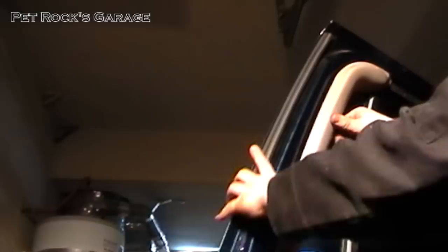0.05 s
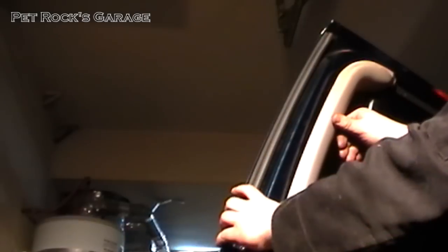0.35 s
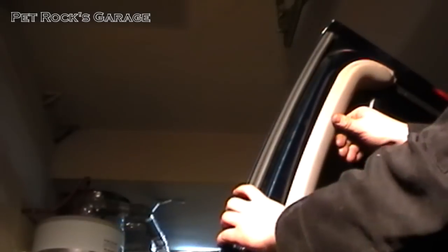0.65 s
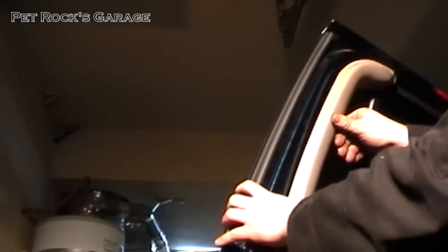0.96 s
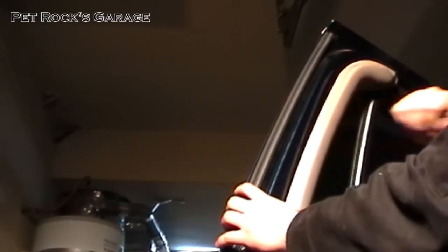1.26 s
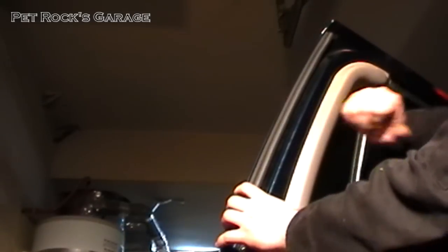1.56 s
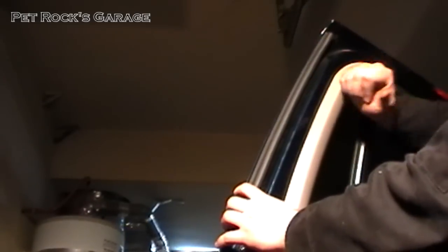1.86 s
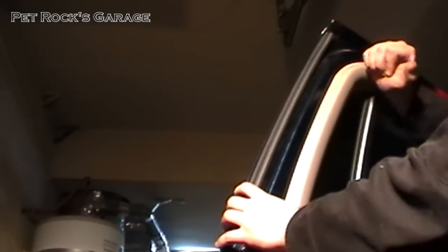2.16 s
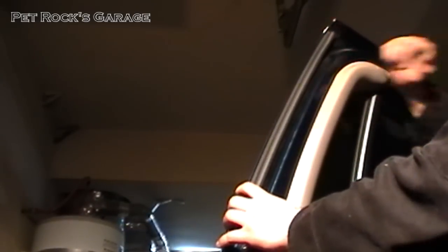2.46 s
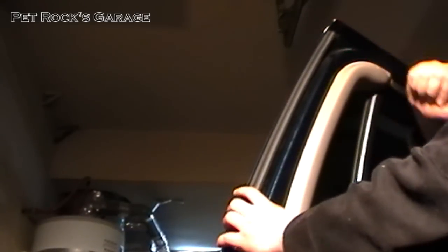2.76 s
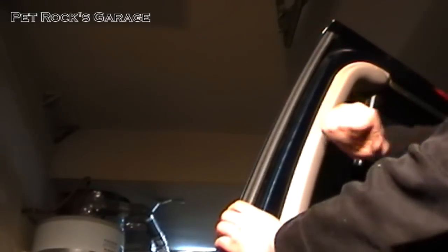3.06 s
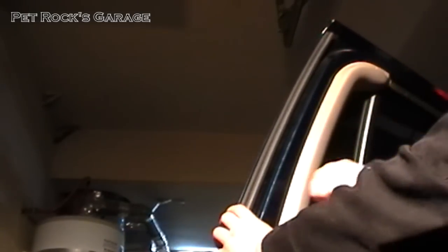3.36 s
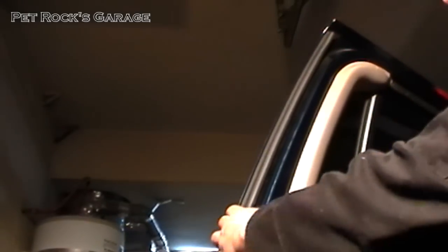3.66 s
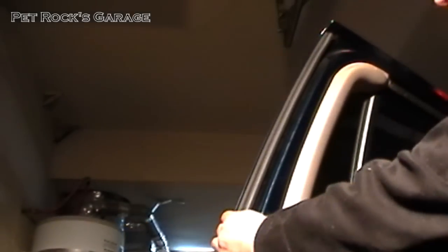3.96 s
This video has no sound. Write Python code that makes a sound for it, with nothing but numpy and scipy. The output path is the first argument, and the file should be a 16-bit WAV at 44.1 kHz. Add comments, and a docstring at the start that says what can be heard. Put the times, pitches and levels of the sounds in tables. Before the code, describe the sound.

A fist knocks plastic trim onto a car door frame. Light ticks and a clip snap lead to a loud, ringing crack, then hollow knocks with low booms. A sleeve rustles close by in a small garage with faint ventilation.

```python
"""A small garage, ventilation running: a fist knocks the plastic trim home on an open car door's frame.
Each knock or clip snap is a light first touch, then the hollow panel, the clack and crack of its clips,
and the boom of the door. The hardest clip sets the steel frame ringing. In between, a sleeve rustles
and the trim ticks under the fingers. A limiter ducks the loud hits, so the room swells up behind them."""
import sys
import numpy as np
from scipy import signal
from scipy.fft import rfft, irfft
from scipy.io import wavfile

SR = 44100
rng = np.random.default_rng(int(sys.argv[2]) if len(sys.argv) > 2 else 0)


def waveform_to_disk(signal):
    """Save audio, clipped to [-1, 1], as 16-bit WAV at the path in sys.argv[1]."""
    frames = np.transpose(np.atleast_2d(signal))
    scaled = np.clip(frames, -1, 1) * 32767
    samples = np.round(scaled).astype(np.int16)
    wavfile.write(sys.argv[1], SR, samples)


N = 176400
T = np.arange(N) / SR
SNAP_RISE_S = 0.00026   # attack of every hard contact


def from_db(db):
    """Decibels to gain."""
    return 10 ** (np.asarray(db) / 20)


def at_hz(table, hz, column=1):
    """Read a table on a log-frequency axis."""
    rows = np.array(table)
    return np.interp(np.log(hz + 1e-3), np.log(rows[:, 0]), rows[:, column])


def add(out, start_s, x):
    """Mix x in from start_s."""
    i = max(int(start_s * SR), 0)
    out[i:i + len(x)] += x[:max(N - i, 0)]


def lag(x, seconds):
    """One-pole smoothing."""
    pole = np.exp(-1 / (seconds * SR))
    return signal.lfilter([1 - pole], [1, -pole], x)


def noise(colour):
    """Steady noise of a given colour, rms 1."""
    hz = np.fft.rfftfreq(N, 1 / SR)
    phases = np.exp(2j * np.pi * rng.random(len(hz)))
    x = irfft(phases * from_db(at_hz(colour, hz)) * (hz > 20), N)
    return x / x.std()


def burst(colour, t60_s, rise_s, hold_s):
    """Countless close modes struck together: they rise, hold while the contact lasts, and die away."""
    t = T[:SR]
    envelope = (1 - np.exp(-(t / rise_s) ** 2)) * from_db(-60 * np.maximum(t - hold_s, 0) / t60_s)
    uneven = rfft(rng.standard_normal(SR) * envelope)
    even = uneven / (np.abs(uneven) + 1e-12)   # no mode stands out
    x = irfft(even * from_db(at_hz(colour, np.fft.rfftfreq(SR, 1 / SR))), SR) * np.sqrt(envelope)
    return x * np.sqrt(np.sum(envelope ** 2) / np.sum(x ** 2))


def ring(modes, rise_s):
    """Single decaying modes, struck a little differently every time."""
    t = T[:2 * SR]
    x = 0
    for pitch_hz, level_db, t60_s in modes:
        decay = from_db(level_db + rng.normal(0, 1) - 60 * t / t60_s)
        x = x + decay * np.sin(2 * np.pi * (pitch_hz * t + rng.random()))
    return x * (1 - np.exp(-(t / rise_s) ** 2))


# Colour of the ventilation bed: freq_hz, relative_db
VENT_COLOUR = [(25, -42.5), (50, -25), (110, -13), (170, -4), (256, 0), (373, -1.5), (490, -13.5),
               (840, -12), (2550, -27), (3620, -29), (7300, -38), (12200, -36.5), (16000, -44)]


def ventilation():
    """Moving air: a low, steady rush."""
    return from_db(-49.5) * noise(VENT_COLOUR)


def electrical_whine(pitch_hz=13022):
    """One thin, faint, steady tone."""
    return from_db(-70) * np.sin(2 * np.pi * pitch_hz * T)


# The garage's reverb tail: freq_hz, level_db, t60_s
GARAGE_TAIL = [(44, -18.5, 1.6), (99, -21, 0.52), (204, -8.5, 0.5), (494, -7, 0.45), (1296, -4, 0.5),
               (3600, -8.5, 0.5), (6700, -9, 0.45), (11200, -15, 0.37), (16000, -18, 0.28)]


def garage_reverb(send, build_s=0.0027, diffuse_share=0.45):
    """The room dies away band by band, as dense echoes and a wash of stored energy; mid and side."""
    edges = np.concatenate([np.geomspace(30, 2000, 14)[:-1], np.geomspace(2000, 17000, 18)])
    white = rfft(rng.standard_normal((2, N)))
    hz = np.fft.rfftfreq(N, 1 / SR)
    wash, impulse = 0, 0
    for low, high in zip(edges, edges[1:]):
        centre_hz = np.sqrt(low * high)
        gain, t60_s = from_db(at_hz(GARAGE_TAIL, centre_hz)), at_hz(GARAGE_TAIL, centre_hz, column=2)
        band = irfft(white * ((hz >= low) & (hz < high)), N)
        band_pass = signal.butter(2, [low, high], "band", fs=SR, output="sos")
        power = signal.sosfilt(band_pass, send + 1e-12) ** 2
        # the wash follows the source's energy but loses its fine colour
        stored = lag(lag(power, build_s), t60_s / np.log(1e6))
        wash = wash + gain * np.sqrt(stored) * band / band.std()
        decay = from_db(-60 * T[:SR] / t60_s) * (1 - np.exp(-T[:SR] / build_s))
        impulse = impulse + gain * band[:, :SR] * decay / np.linalg.norm(decay)
    echoes = signal.fftconvolve(send[None], impulse, axes=1)[:, :N]
    return np.sqrt(diffuse_share) * wash + np.sqrt(1 - diffuse_share) * echoes


# Stereo width across the spectrum: freq_hz, side_gain_db
STEREO_WIDTH = [(40, 5.5), (130, -7.5), (500, -9.5), (1100, -7), (2200, -8.5), (5000, -40), (9000, -35.5),
                (13000, -0.5)]


def stereo_spread(side):
    """What differs between left and right: widest in the deep bass and at the very top."""
    width = from_db(at_hz(STEREO_WIDTH, np.fft.rfftfreq(2 * N, 1 / SR)))
    return irfft(rfft(side, 2 * N) * width)[:N] * np.array([[1], [-1]])


# Swishes of the sleeve: centre_s, half_length_s, level_db
SLEEVE_SWISHES = [(0.004, 0.07, -54.5), (0.212, 0.08, -47.5), (1.027, 0.03, -51), (1.18, 0.018, -51.5),
                  (1.314, 0.034, -68), (1.545, 0.13, -57.5), (2.887, .06, -54.5), (3.37, 0.046, -55),
                  (3.636, 0.065, -51)]
# Colour of rubbing cloth: freq_hz, relative_db
CLOTH_COLOUR = [(300, -12), (1200, -1), (3200, 1.5), (5800, -6.5), (7300, -8), (9500, -4), (13000, -5),
                (16000, -1.5)]


def sleeve_rustle(grain_db=0.5):
    """Cloth slides on cloth in soft, grainy swells."""
    power = sum(from_db(level_db) ** 2 * np.exp(-((T - centre_s) / half_length_s) ** 2)
                for centre_s, half_length_s, level_db in SLEEVE_SWISHES)
    grain = noise([(30, 15), (200, -7), (1500, -40), (8000, -72)])
    return np.sqrt(power) * from_db(grain_db * grain) * noise(CLOTH_COLOUR)


# Colour of a clip's clack: freq_hz, relative_db
CLACK_COLOUR = [(500, -3.5), (1300, -1.5), (2100, 2), (2500, -3), (3000, 5), (3800, 4), (4800, -4),
                (5700, -12.5), (8000, -26)]


def clip_clack(hold_s):
    """A clip seats with a short, dry clack."""
    return burst(CLACK_COLOUR, t60_s=0.021, rise_s=SNAP_RISE_S, hold_s=hold_s)


# Colour of cracking plastic edges: freq_hz, relative_db
CRACK_COLOUR = [(2000, -14.5), (5000, -2), (5750, -15.5), (6500, -3), (7250, -11.5), (8200, -3),
                (11500, 0.5), (14000, -2), (16000, -3.5)]


def edge_crack(hold_s):
    """Plastic edges meet with a sharp, bright crack."""
    return burst(CRACK_COLOUR, t60_s=0.04, rise_s=SNAP_RISE_S, hold_s=hold_s)


# Cues for the small ticks: start_s, clack_db, crack_db, metal_db
TICK_CUES = [(0.312, -36, -38.5, -26.5), (0.889, -55, -70, -75), (1.1215, -38.5, -52.5, -66)]
# Ping of a metal clip: pitch_hz, level_db, t60_s
METAL_CLIP_MODES = [(3849, -9, 0.047), (8300, -8.5, 0.057), (10300, -11.5, 0.091)]


def finger_ticks():
    """Trim and clips click lightly under the fingers."""
    out = np.zeros(N)
    for start_s, clack_db, crack_db, metal_db in TICK_CUES:
        add(out, start_s, from_db(clack_db) * clip_clack(0) + from_db(crack_db) * edge_crack(0))
        add(out, start_s, from_db(metal_db) * ring(METAL_CLIP_MODES, SNAP_RISE_S))
    return out


# Tones of the flexing trim: pitch_hz, level_db, t60_s
TRIM_FLEX_MODES = [(250, -7, .22), (1290, 0, .12), (1400, -5, .1), (1880, -4, .08), (2030, -6, .08)]


def trim_flex(start_s=0.4405):
    """The thumb's press makes the trim flex as its first clip snaps."""
    out = np.zeros(N)
    add(out, start_s, from_db(-22) * ring(TRIM_FLEX_MODES, SNAP_RISE_S))
    return out


# Bright ring of the steel frame: pitch_hz, level_db, t60_s
STEEL_FRAME_MODES = [(2637, -12, .35), (3620, 4, .6), (3700, -4.5, 0.51), (3871, 7, .6), (4040, 2, .6),
                     (4231, -7, .55)]


def frame_ring(start_s=1.59):
    out = np.zeros(N)
    add(out, start_s, from_db(-28.5) * ring(STEEL_FRAME_MODES, SNAP_RISE_S))
    return out


# Low notes of the whole door: pitch_hz, level_db, t60_s
BOOM_MODES = [(44.4, -15.5, 2), (70.4, -12.5, 1.1), (94.3, -1, 0.4), (119.6, -10.5, 0.75), (135.9, 3, 0.31),
              (154.3, -3, 0.62), (236, -1.5, .6), (345.7, -16.5, 1.1)]
# Colour of the dense modes between them: freq_hz, relative_db
BOOM_COLOUR = [(28, -37.5), (45, -4.5), (60, -14), (120, 0), (250, 3), (450, -5.5), (800, -17), (2000, -38)]


def door_boom(rise_s=0.02):
    """The whole door takes up the hit and blooms into a low boom."""
    boom = ring(BOOM_MODES, rise_s)
    boom[:SR] += burst(BOOM_COLOUR, t60_s=0.48, rise_s=rise_s, hold_s=rise_s)
    return boom


# Colour of the panel's dense modes: freq_hz, relative_db
PANEL_COLOUR = [(60, -33), (150, -6.5), (350, -1.5), (650, -1.5), (1050, -6.5), (1500, -11), (2400, -14.5),
                (5000, -35.5)]
# Its strongest notes: pitch_hz, level_db, t60_s
PANEL_NOTES = [(244.6, -12.5, 0.07), (352, -11, 0.069), (434, -12.5, 0.11), (561, -5.5, 0.062),
               (650, -7, .06), (981.5, -4, 0.056), (1148, -13.5, 0.081), (1383, -13.5, 0.069),
               (1844, -15, 0.086)]


def hollow_panel(hold_s, rise_s=0.0018):
    """The hollow plastic panel gives the knock its short, boxy body."""
    body = burst(PANEL_COLOUR, t60_s=0.072, rise_s=rise_s, hold_s=hold_s)
    return body + ring(PANEL_NOTES, rise_s)[:SR]


# Brief ring of the clips as they seat: pitch_hz, level_db, t60_s
SEATING_MODES = [(2720, -21, 0.12), (3550, -26, 0.037), (3720, -5, 0.034), (3855, -3.5, 0.011),
                 (4110, -19, 0.021)]


def trim_hit(hold_s, panel_db, clack_db, crack_db, crack_cutoff_hz):
    """One contact on the trim sounds the panel, its clips and its edges together."""
    panel = hollow_panel(hold_s)
    clack = clip_clack(hold_s) + ring(SEATING_MODES, SNAP_RISE_S)[:SR]
    low_pass = signal.butter(2, crack_cutoff_hz, fs=SR, output="sos")
    crack = signal.sosfilt(low_pass, edge_crack(hold_s) + 1e-18)
    return from_db(panel_db) * panel + from_db(clack_db) * clack + from_db(crack_db) * crack


# Cues for knocks and clip snaps on the trim: hit_s, touch_lead_s, touch_gain_db, hold_s, panel_db,
# clack_db, crack_db, crack_cutoff_hz, boom_db, send_db
HIT_CUES = [ (0.4401, 0.0021, -2.5, 0.0011, -26, -18, -4.5, 17600, -58, 1.5),
            (1.5829, 0.0059, 5.5, 0.0067, -4.5, 2.5, 4.5, 15000, -42, -0.5),
            (1.59, .001, -12, 0.0031, 1, 4.5, 4, 13000, -48, -1),
            (1.919, 0.0036, 4.5, 0.00033, -15.5, -12, -32, 11100, -22.5, 2.5),
            (2.2216, 0.0049, 9, 0.001, -8, -4, 3.5, 10900, -20.5, -0.5),
            (2.61, 0.0061, -1, 0.00052, -20.5, -21, -17, 10800, -26, 6),
            (2.6445, 0.0014, -15, 0.00033, -46, -14.5, -23.5, 14900, -41, -2.5),
            (3.1522, 0.0042, 5.5, 0.0022, -8.5, -15, -18.5, 10500, -28, -1.5),
            (3.4015, 0.0064, 1.5, 0.0066, -10, -14.5, -15, 10400, -33, 1.5),
            (3.7081, 0.0038, -2, 0.0062, -10.5, -13, -17.5, 10000, -29, 2),
            (3.986, 0.0032, -17, 0.0015, -21, -45, -40, 10000, -10.5, 8)]


def trim_knocks_and_snaps():
    """A light touch, then a knock or a clip snapping in; returns direct sound and reverb send."""
    direct, send = np.zeros(N), np.zeros(N)
    for (hit_s, touch_lead_s, touch_gain_db, hold_s, panel_db, clack_db, crack_db,
         crack_cutoff_hz, boom_db, send_db) in HIT_CUES:
        hit = np.zeros(N)
        touch = trim_hit(0, panel_db=-37, clack_db=-29, crack_db=-28.5, crack_cutoff_hz=crack_cutoff_hz)
        add(hit, hit_s - touch_lead_s, from_db(touch_gain_db) * touch)
        add(hit, hit_s, trim_hit(hold_s, panel_db, clack_db, crack_db, crack_cutoff_hz))
        add(hit, hit_s, from_db(boom_db) * door_boom())
        direct += hit
        send += from_db(send_db) * hit
    return direct, send


def scene():
    """Knocks, snaps and handling in the garage, over ventilation and whine, mixed as mid and side."""
    hits, hit_send = trim_knocks_and_snaps()
    flex, frame = trim_flex(), frame_ring()
    handling = flex + finger_ticks() + sleeve_rustle()
    direct = hits + frame + handling
    room_mid, room_side = garage_reverb(hit_send + handling)
    near_echo = from_db(-3) * np.interp(T - 0.0069, T, direct)   # a 6.9 ms slap widens the direct sound
    mid = direct + room_mid + ventilation()
    side = near_echo + room_side + ventilation()
    return mid + stereo_spread(side) + electrical_whine()


def record(dry):
    """A fast limiter that recovers slowly, then soft clipping and a cut of the very top."""
    ceiling_db, release_db_per_s, attack_s, look_ahead_s = -3.5, 153.5, 0.00018, 0.00035
    over_db = np.maximum(20 * np.log10(np.abs(dry).max(axis=0) + 1e-9) - ceiling_db, 0)
    held_db = np.maximum.accumulate(over_db + release_db_per_s * T) - release_db_per_s * T
    duck_db = np.interp(T + look_ahead_s, T, lag(held_db, attack_s))
    limited = dry * from_db(-duck_db)
    low_pass = signal.ellip(10, .1, 80, 15850, fs=SR, output="sos")
    return signal.sosfilt(low_pass, 0.57 * np.tanh(limited / 0.77))


dry = scene()
out = record(dry)
waveform_to_disk(out)
```